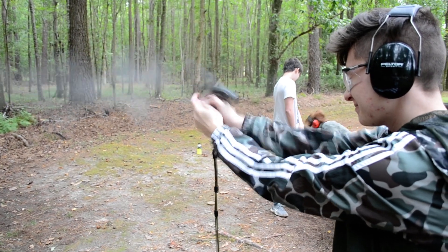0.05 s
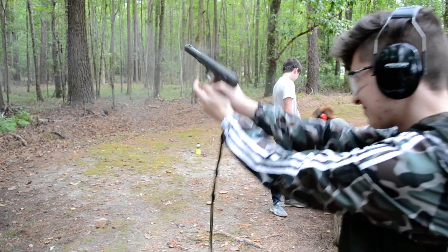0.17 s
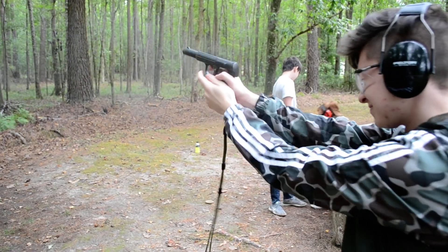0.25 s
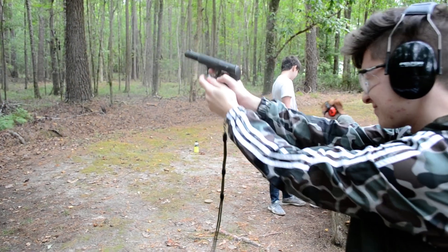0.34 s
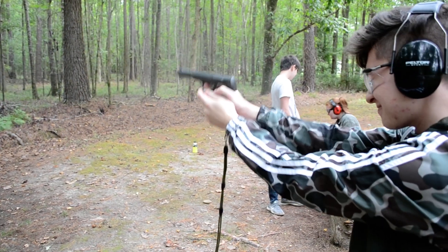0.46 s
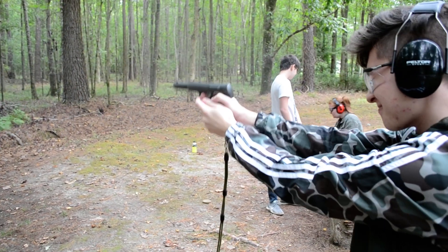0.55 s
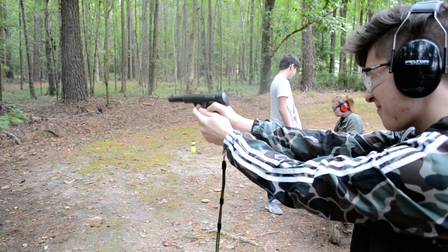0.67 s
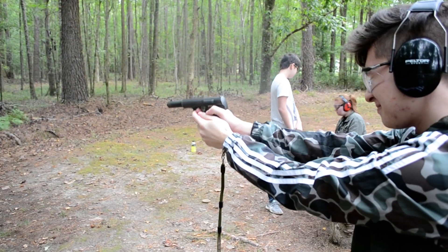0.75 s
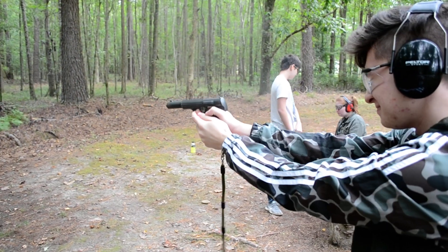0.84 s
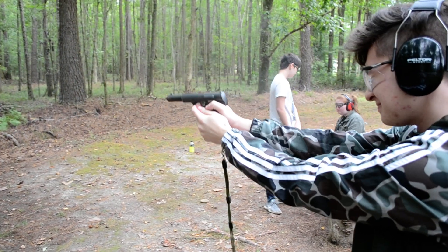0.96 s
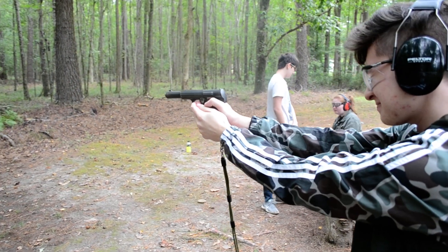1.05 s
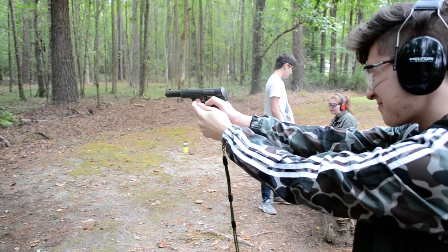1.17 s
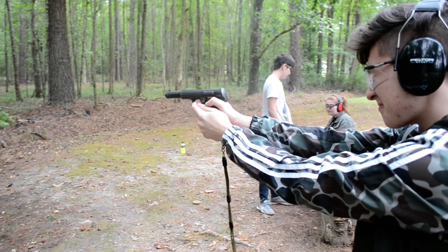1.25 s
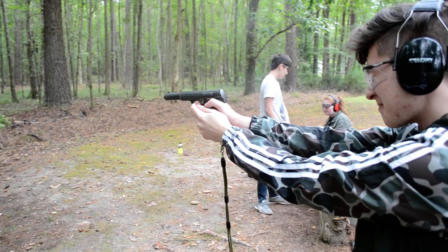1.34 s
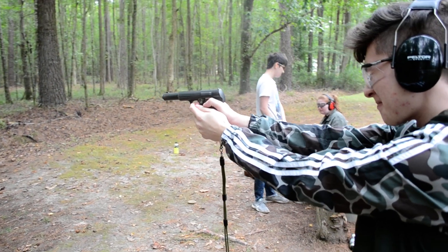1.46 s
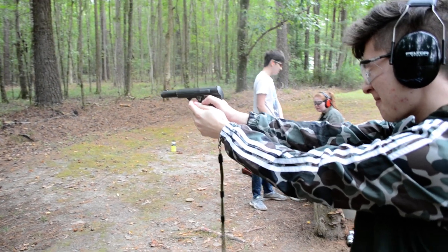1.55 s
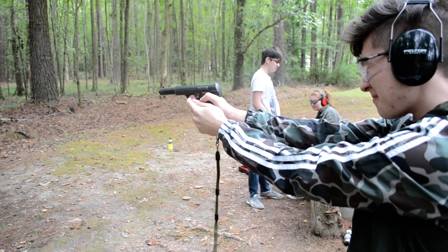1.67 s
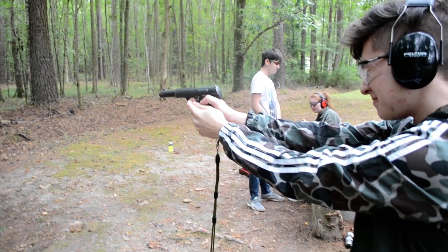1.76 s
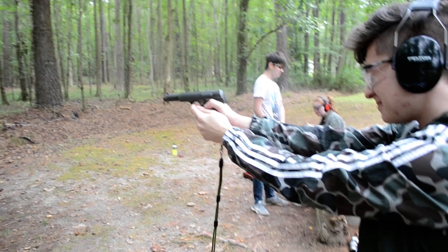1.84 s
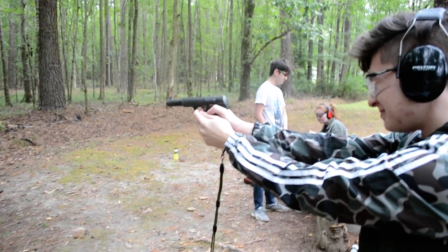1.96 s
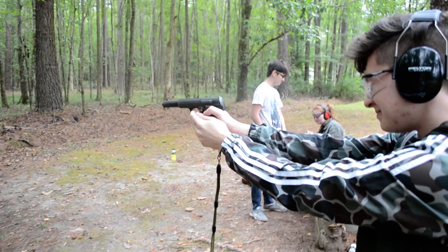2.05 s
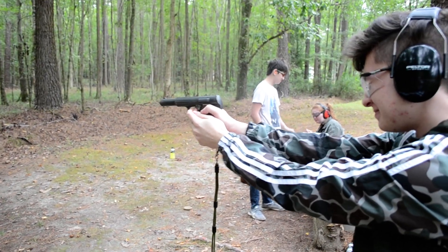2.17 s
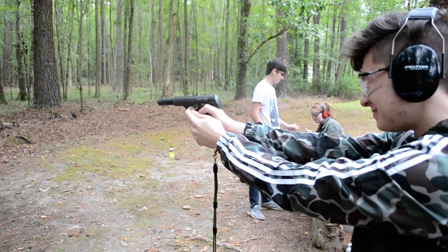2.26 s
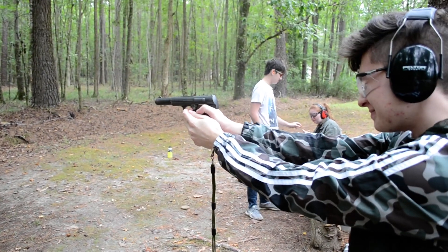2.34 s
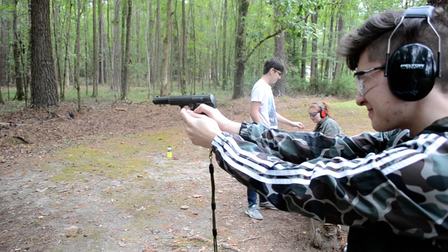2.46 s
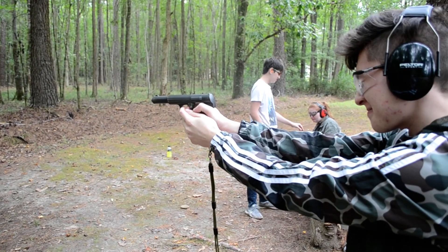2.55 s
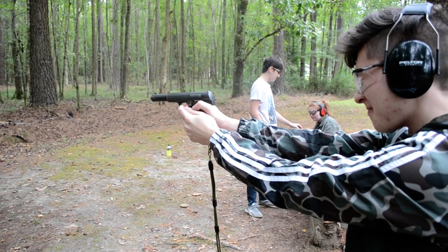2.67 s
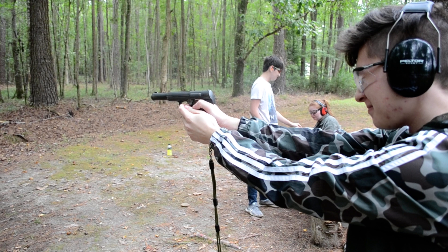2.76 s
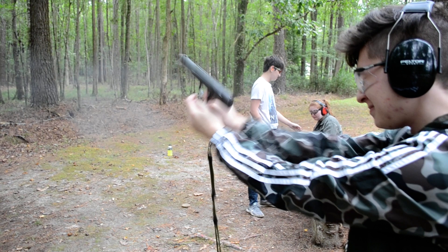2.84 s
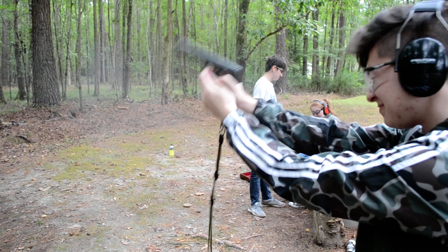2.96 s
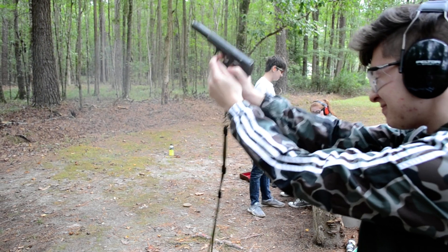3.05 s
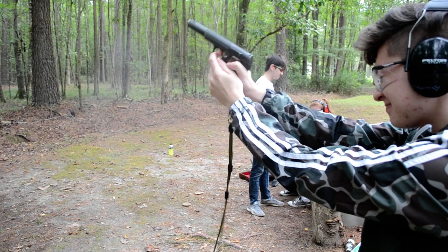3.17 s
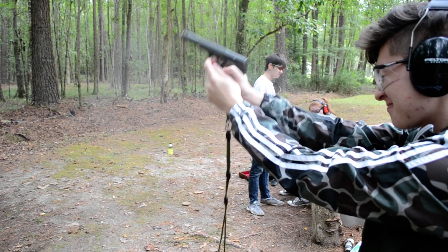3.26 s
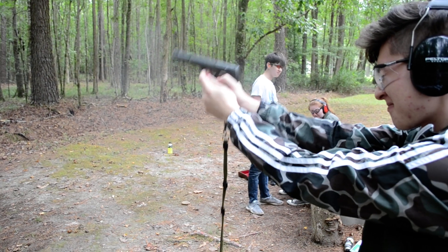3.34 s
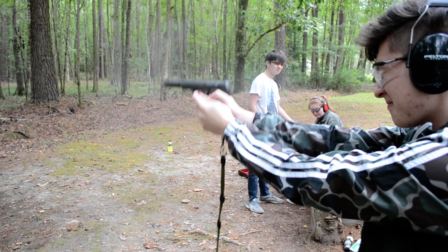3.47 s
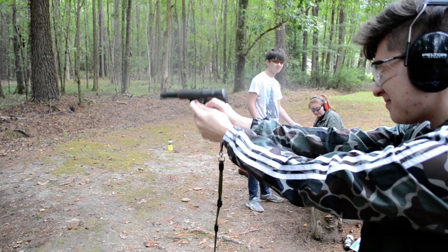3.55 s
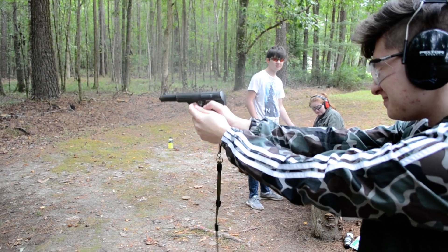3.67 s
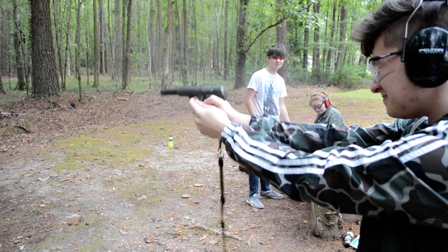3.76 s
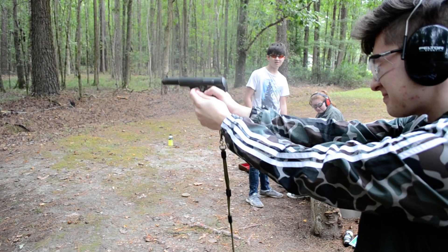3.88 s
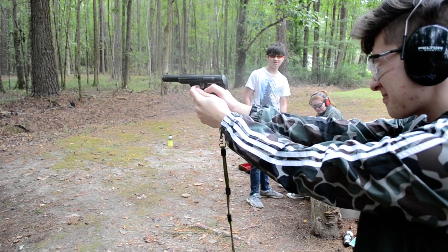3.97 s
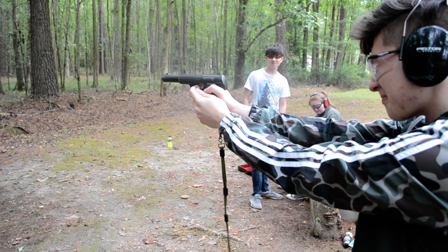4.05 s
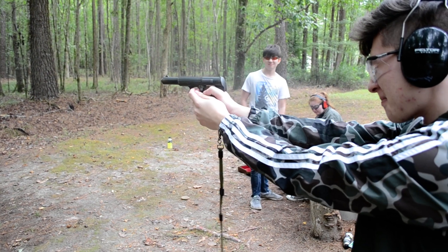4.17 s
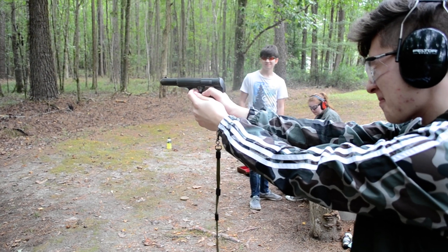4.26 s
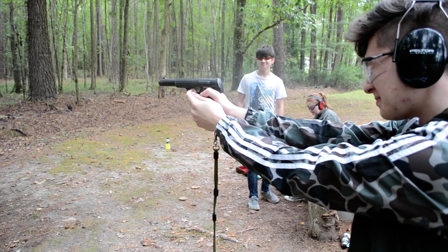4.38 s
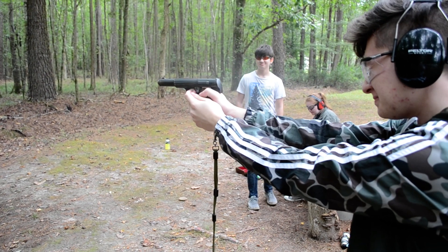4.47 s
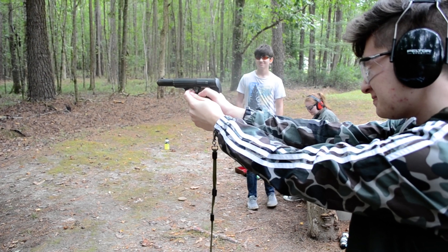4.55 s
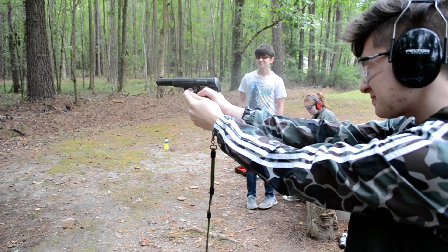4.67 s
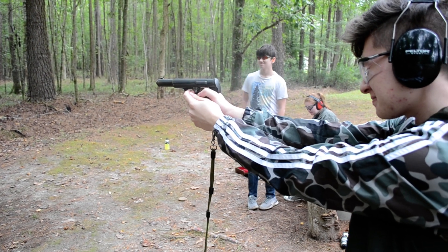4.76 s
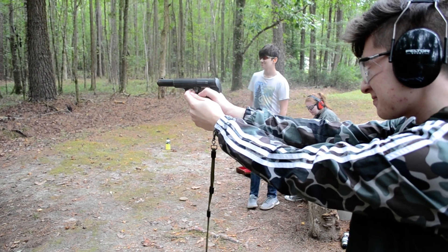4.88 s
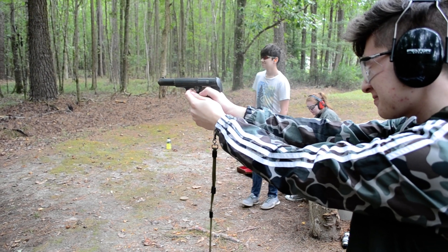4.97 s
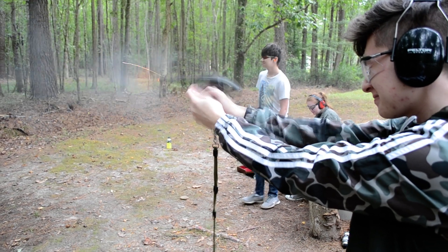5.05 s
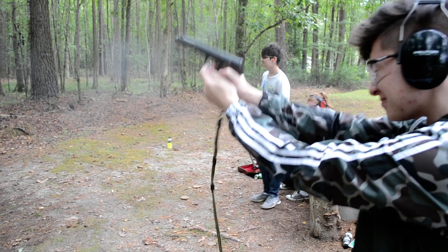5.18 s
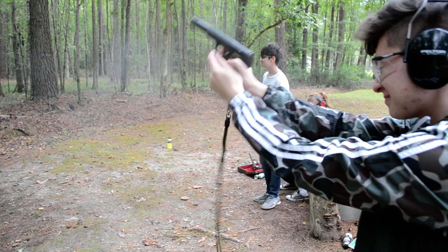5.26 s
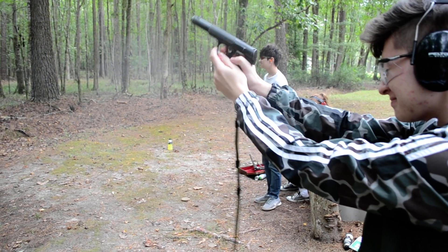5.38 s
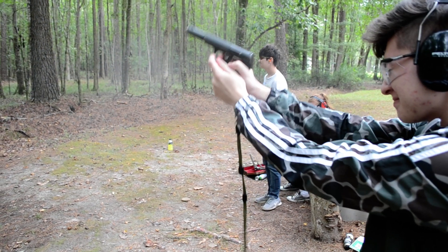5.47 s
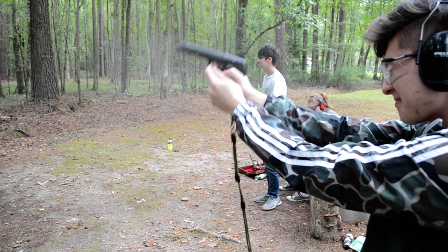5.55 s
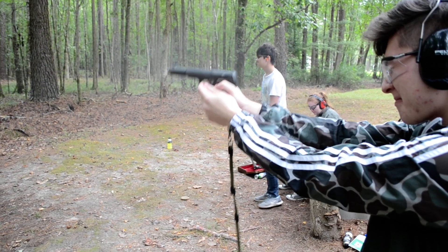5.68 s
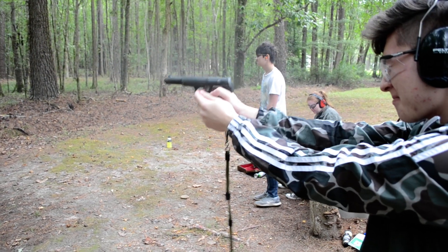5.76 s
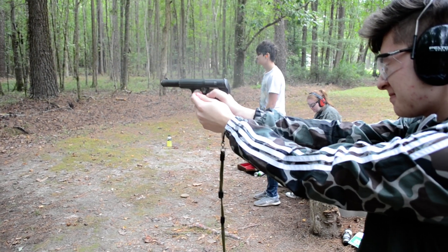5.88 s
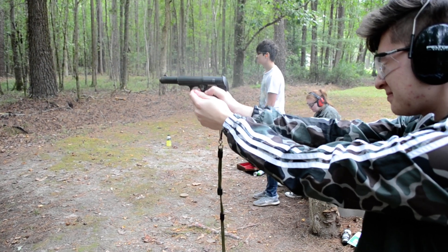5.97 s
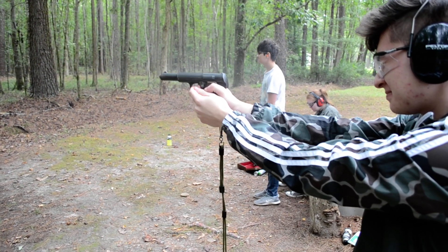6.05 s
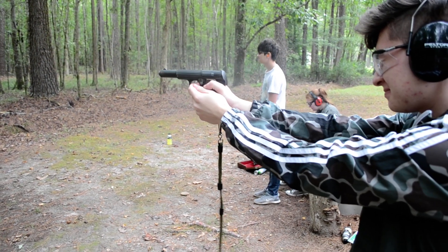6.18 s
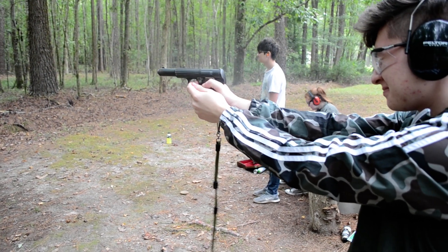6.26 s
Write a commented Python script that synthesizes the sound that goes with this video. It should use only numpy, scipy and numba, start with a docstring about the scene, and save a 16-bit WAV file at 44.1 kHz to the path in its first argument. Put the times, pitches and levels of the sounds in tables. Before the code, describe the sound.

Faint woodland air is broken at about 0.06 seconds by a close pistol shot: a tiny striker click, a hard overloaded crack, a short mid-pitched boom and churning gas. A rough, grainy echo surges back from ground and tree line, then thins and darkens over more than two seconds. A spent case ticks faintly in dry leaves at 1.1. A sleeve rubs briefly near 1.8, with small dry grip clicks to 2.5. The second shot cracks at 2.8 with a similar rolling tail; its case lands at 3.9 with a clear hollow knock and skitter. Light clicks cluster from 4.3 to 4.75. The third, fullest shot comes at 5.07, its echo still fading at the end, around 6.3, with another faint case at 6.0. Sound is mono, bass-light and clipped, the level squashed by each blast, then recovering.

```python
"""A faint wash of woodland air, broken at once by the first of three pistol shots in a clearing.
Each shot is a noise crack, a pressure pulse, a sine boom and churning gas; random grains, shaped by band
decays and an envelope of ground, tree line and deep wood, make its echo. Spent cases tick and skitter
in dry leaves; a sleeve rubs and small clicks of grip and clothing sound between shots.
The microphone overloads, its port colours the sound, and a limiter turns it down before clipping."""
import sys
import numpy as np
from scipy import signal
from scipy.io import wavfile
from numba import njit

SR = 44100
rng = np.random.default_rng(int(sys.argv[2]) if len(sys.argv) > 2 else 0)


def transcribe(signal):
    """Save signal, clipped to [-1, 1], as a 16-bit WAV file at the path in sys.argv[1]."""
    frames = np.atleast_2d(signal).T
    limited = np.clip(frames, -1, 1)
    pcm = np.round(limited * 32767).astype(np.int16)
    wavfile.write(sys.argv[1], SR, pcm)


N = 278712

# still air in the wood: freq_hz, relative_density_db
AIR_SPECTRUM = [(25, 1.5), (65, 9.5), (150, 2), (330, -1.5), (600, 3.5), (1000, 0.5), (2000, -10),
                (3500, -20.5), (4200, -24), (4950, -21), (5800, -28), (10000, -36)]
# sleeve strokes: peak_s, level_db, softness_0_to_1
SLEEVE_STROKES = [(1.786, -54, 0), (1.832, -59.5, 0), (2.502, -66, 1)]
# crisp cloth: freq_hz, relative_density_db
CRISP_CLOTH_SPECTRUM = [(500, -22), (3000, 4), (5000, -3), (9500, -1), (14000, -0.5)]
# soft cloth: freq_hz, relative_density_db
SOFT_CLOTH_SPECTRUM = [(800, -13), (2500, 4), (3800, 4), (5000, -12), (10000, -22)]
# clicks of grip and clothing: start_s, peak_db, centre_hz
HANDLING_CLICKS = [(1.833, -40, 9000), (1.990, -50.5, 6000), (2.162, -59, 7000), (2.187, -57.5, 7500),
                   (2.255, -65, 9000), (2.510, -62, 9000), (4.301, -50.5, 7500), (4.378, -54, 7000),
                   (4.464, -48, 7980), (4.547, -61.5, 7000), (4.745, -55, 9000)]
# spent cases landing: start_s, tick_db, skitter_db, skitter_t60_s, knock_db (tick, skitter: before leaf filter)
CASE_LANDINGS = [(1.105, -57, -49, 0.48, -70), (3.879, -44, -47, 0.71, -17), (6.021, -44, -57, 0.56, -71)]
# hollow thing struck by a case: freq_hz, relative_level_db, t60_s
KNOCK_MODES = [(170, -5.5, 0.071), (228, 1, 0.054), (261, -3, 0.17), (301, -7.5, .2)]
# dry leaves, as a filter: freq_hz, gain_db
LEAF_SPECTRUM = [(1000, -23), (4000, 4.5), (7000, -6), (9500, -3.5), (14000, -4)]
# scattering wood: freq_hz, relative_start_density_db, t60_s (before the echo envelope)
WOOD_BANDS = [(40, -28, 3.9), (133, -25, 2.9), (250, -18.5, 3.6), (378, -12.5, 3.76), (550, -3.5, 3.38),
              (753, 1.5, 3.256), (1300, 1.74, 2.83), (1860, -3.5, 2.363), (2555, -4, 2.01),
              (3350, -7.5, 1.65), (4630, -10, 1.318), (6900, -15, 1.032), (10500, -16.5, 0.7)]
# churning muzzle cloud: freq_hz, relative_density_db
GAS_SPECTRUM = [(30, -2), (250, -1), (450, -1.5), (800, -17), (2000, -36.5)]
# shots: start_s, strength_db, echo_tilt_db_per_octave, boom_and_gas_heft_db, tree_line_db, deep_swell_s
SHOT_EVENTS = [(0.0607, 0.52, -0.5, -3, 8, 0.52), (2.8232, 0.2, 0.22, -3.5, 8.5, 0.49),
               (5.0728, 1.64, 0.15, 3.5, 9.5, 0.72)]
# microphone behind a small port, bass cut against wind: freq_hz, gain_db
MIC_RESPONSE = [(20, -23), (100, -14.5), (250, -8.5), (550, -2), (900, -2), (6000, 2), (7300, 2),
                (7950, -3), (8500, 3.5), (9400, 4), (10200, -1), (11000, -11), (11700, -26.5),
                (12500, -47.5)]

STROKE_RISE_DB_PER_S, STROKE_FALL_DB_PER_S = 450, 230
# echo envelope, on top of the WOOD_BANDS decay
GROUND_DB, GROUND_T60_S = 11.5, 0.33
TREE_LINE_S, TREE_RISE_S, TREE_HOLD_S, TREE_T60_S = 0.043, 0.016, 0.12, 0.69
DEEP_DB, SWELL_DB, SWELL_WIDTH_S = -1.54, 0.7, 0.28
LINGER_FROM_S, LINGER_DB_PER_S = 1.4, 3.5  # sound scattered many times over dies more slowly
BAND_EDGE_HZ = 16200


def gain_of(level_db):
    """Decibels to an amplitude factor."""
    return 10 ** (np.asarray(level_db) / 20)


def evened(x):
    """Scales to rms 1."""
    return x / np.sqrt(np.mean(x ** 2) + 1e-20)


def read(points, freq_hz, column=1):
    """One table column, interpolated on a log-frequency axis."""
    table = np.transpose(points)
    return np.interp(np.log(freq_hz + 1), np.log(table[0] + 1), table[column])


def add(mix, start_s, sound):
    """Mixes a sound in at its start time."""
    part = mix[round(start_s * SR):][:len(sound)]
    part += sound[:len(part)]


def seconds(length_s):
    """Time axis in seconds."""
    return np.arange(int(length_s * SR)) / SR


def fading(t, t60_s):
    """Exponential decay: 60 dB in t60_s."""
    return np.exp(-np.log(1000) * t / t60_s)


def coloured(x, spectrum, size=4096):
    """Causal minimum-phase filter with the given spectrum."""
    freq_hz = abs(np.fft.fftfreq(size, 1 / SR))
    log_gain = np.log(gain_of(read(spectrum, freq_hz)))
    taps = np.fft.ifft(np.exp(np.conj(signal.hilbert(log_gain)))).real
    return signal.oaconvolve(x, taps[:size // 2])[:len(x)]


def grains(count, per_s, spread_db):
    """Sparse random clicks of rms 1, most small and a few large."""
    size = gain_of(spread_db * np.minimum(rng.exponential(1, count), 6))
    sign = rng.choice([-1, 1], count)
    present = rng.random(count) < per_s / SR
    return evened(size * sign * present)


def wander(t, per_s):
    """Slow random curve: straight lines between unit-variance knots."""
    knots_s = np.arange(1024) / per_s
    return np.interp(t, knots_s, rng.standard_normal(len(knots_s)))


def air(level_db=-54, swell_db=2.0):
    """Faint wash of the wood: coloured noise of slowly wandering level."""
    swell = gain_of(swell_db * wander(np.arange(N) / SR, per_s=5.5))
    wash = evened(coloured(rng.standard_normal(N), AIR_SPECTRUM))
    return gain_of(level_db) * swell * wash


def sleeve(peak_s, level_db, softness):
    """Jacket cloth rubs in fine grains: a stroke swells fast and dies away, a soft one duller."""
    t = np.arange(N) / SR - peak_s
    stroke_db = level_db - np.maximum(-t * STROKE_RISE_DB_PER_S, t * STROKE_FALL_DB_PER_S)
    fibres = grains(N, per_s=4400, spread_db=4)
    soft = np.clip(softness, 0, 1)
    crisp_rub = evened(coloured(fibres, CRISP_CLOTH_SPECTRUM))
    soft_rub = evened(coloured(fibres, SOFT_CLOTH_SPECTRUM))
    return gain_of(stroke_db) * ((1 - soft) * crisp_rub + soft * soft_rub)


def click(peak_db, centre_hz, t60_s=0.0092):
    """Tiny dry click: a decaying noise burst, band-shaped and scaled to its peak."""
    t = seconds(.04)
    burst = rng.standard_normal(len(t)) * fading(t, t60_s)
    snap = coloured(burst, [(centre_hz / 4, -20), (centre_hz, 0), (centre_hz * 2, -10)])
    return gain_of(peak_db) * snap / abs(snap).max()


def spent_case(tick_db, skitter_db, skitter_t60_s, knock_db):
    """A brass case ticks and skitters in dry leaves; decaying modes give the hollow knock."""
    t = seconds(.7)
    tick = gain_of(tick_db) * rng.standard_normal(len(t)) * fading(t, 0.018)
    skitter = gain_of(skitter_db) * grains(len(t), per_s=6000, spread_db=2.5)
    skitter *= fading(t, skitter_t60_s) * (1 - np.exp(-t / .013))
    knock = sum(gain_of(knock_db + mode_db) * np.sin(2 * np.pi * freq_hz * t) * fading(t, t60_s)
                for freq_hz, mode_db, t60_s in KNOCK_MODES)
    return coloured(tick + skitter, LEAF_SPECTRUM) + knock * (1 - np.exp(-t / 0.0021))


def returns(t, tree_line_db, swell_s):
    """Echo strength at delay t: ground, tree line and deep wood add in power."""
    ground = gain_of(GROUND_DB) * fading(t, GROUND_T60_S)
    attack = np.clip((t - TREE_LINE_S) / TREE_RISE_S, 0, 1)
    release = fading(np.maximum(t - TREE_LINE_S - TREE_RISE_S - TREE_HOLD_S, 0), TREE_T60_S)
    tree_line = gain_of(tree_line_db) * attack * release
    swell_db = SWELL_DB * np.exp(-((t - swell_s) / SWELL_WIDTH_S) ** 2)
    linger_db = LINGER_DB_PER_S * np.maximum(t - LINGER_FROM_S, 0)
    deep = gain_of(DEEP_DB + swell_db + linger_db)
    return np.sqrt(ground ** 2 + tree_line ** 2 + deep ** 2)


def echo(tilt_db_per_octave, tree_line_db, swell_s, flutter_db=0.66, near_db=3, near_s=.15):
    """Trunks scatter the blast as random grains; air and leaves take treble from the far ones."""
    t = seconds(4)
    trunks = grains(len(t), per_s=9000, spread_db=2.0)
    trunks = evened(coloured(trunks, [row[:2] for row in WOOD_BANDS]))
    freq_hz, delay_s, bands = signal.stft(trunks, SR, nperseg=512)
    tilt = gain_of(tilt_db_per_octave * np.log2((freq_hz + 100) / 1000))
    band_t60_s = read(WOOD_BANDS, freq_hz, column=2)
    bands = bands * tilt[:, None] * fading(delay_s, band_t60_s[:, None])
    tail = signal.istft(bands, SR, nperseg=512)[1][:len(t)]
    stands_db = flutter_db * wander(t, per_s=45)  # trees stand in clumps
    # the few nearest trunks answer one by one
    singles_db = near_db * np.exp(-t / near_s) * wander(t, per_s=170)
    onset = 1 - np.exp(-t / 0.00099)
    return tail * returns(t, tree_line_db, swell_s) * gain_of(stands_db + singles_db) * onset


def blast(heft_db, crack_db=15, crack_t60_s=0.044, push_db=19, push_s=0.00062, ground_delay_s=.003,
          boom_db=29, boom_hz=660, boom_t60_s=.01, gas_db=7, gas_t60_s=0.16):
    """Crack and pressure pulse; the pulse returns off the ground with a short boom and churning gas."""
    t = seconds(0.35)
    crack = gain_of(crack_db) * rng.standard_normal(len(t)) * fading(t, crack_t60_s)
    push = gain_of(push_db) * (1 - t / push_s) * np.exp(-t / push_s)
    boom = gain_of(boom_db) * np.sin(2 * np.pi * boom_hz * t) * fading(t, boom_t60_s)
    churn = evened(coloured(rng.standard_normal(len(t)), GAS_SPECTRUM))
    gas = gain_of(gas_db) * churn * fading(t, gas_t60_s)
    out = crack + push
    add(out, ground_delay_s, push + gain_of(heft_db) * (boom + gas))
    return out


def scene(striker_db=-38, striker_lead_s=0.003):
    """Sound pressure at the microphone, the same in both channels."""
    mix = air()
    mix += sum(sleeve(*stroke) for stroke in SLEEVE_STROKES)
    for start_s, peak_db, centre_hz in HANDLING_CLICKS:
        add(mix, start_s, click(peak_db, centre_hz))
    for start_s, *landing in CASE_LANDINGS:
        add(mix, start_s, spent_case(*landing))
    for start_s, strength_db, tilt_db_per_octave, heft_db, tree_line_db, swell_s in SHOT_EVENTS:
        strength = gain_of(strength_db)
        # the striker falls just before the bullet leaves
        add(mix, start_s - striker_lead_s, click(striker_db, centre_hz=4000))
        add(mix, start_s, strength * blast(heft_db))
        add(mix, start_s, strength * echo(tilt_db_per_octave, tree_line_db, swell_s))
    return np.array([mix, mix])


@njit
def follow(over_db, attack, release_db):
    """Peak follower: climbs fast toward each peak, lets go by a fixed step per sample."""
    out, held = np.zeros(len(over_db)), 0.
    for i in range(len(over_db)):
        held = max(held - release_db, 0.)
        held += attack * max(over_db[i] - held, 0.)
        out[i] = held
    return out


def limiter(x, threshold_db=-11, ratio=8, attack_s=0.0015, follower_release_db_per_s=70):
    """Turns the gain down as peaks pass the threshold, then recovers steadily."""
    over_db = 20 * np.log10(abs(x) + 1e-9) - threshold_db
    held_db = follow(over_db, 1 / (attack_s * SR), follower_release_db_per_s / SR)
    return x / gain_of((1 - 1 / ratio) * held_db)


def record(dry, overload_db=8, lean=0.26, ceiling=0.6):
    """Lopsided capsule overload, port colour, limiter, converter clipping, then band limit."""
    headroom = gain_of(overload_db)
    capsule = headroom * (np.tanh(dry[0] / headroom + lean) - np.tanh(lean))
    limited = limiter(coloured(capsule, MIC_RESPONSE))
    clipped = np.clip(limited, -ceiling, ceiling)
    softened = coloured(clipped, [(11000, 0), (12500, -14.0)])  # the top octave rolls off
    band_limit = signal.firwin(255, BAND_EDGE_HZ, window=("kaiser", 9), fs=SR)
    out = signal.oaconvolve(softened, band_limit, "same")
    return np.array([out, out])


dry = scene()
out = record(dry)
transcribe(out)
```